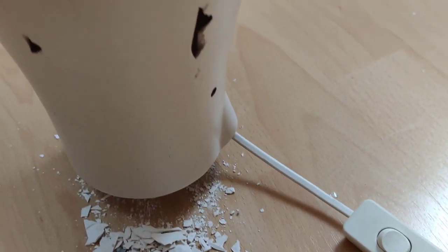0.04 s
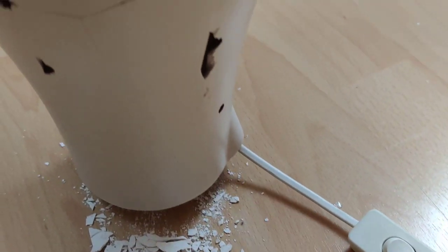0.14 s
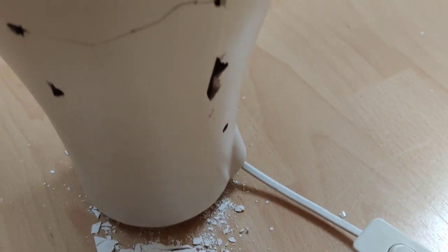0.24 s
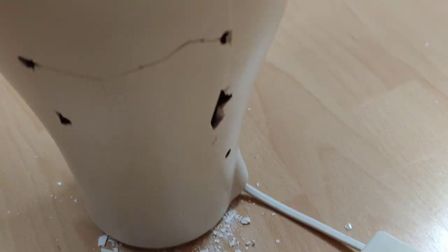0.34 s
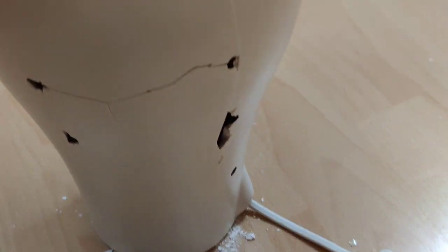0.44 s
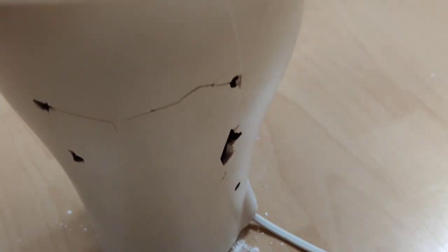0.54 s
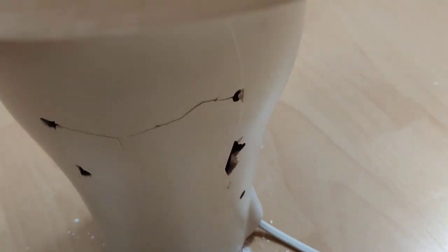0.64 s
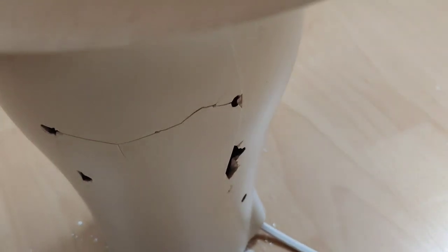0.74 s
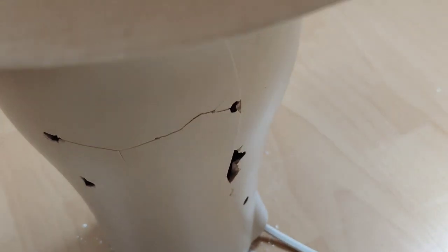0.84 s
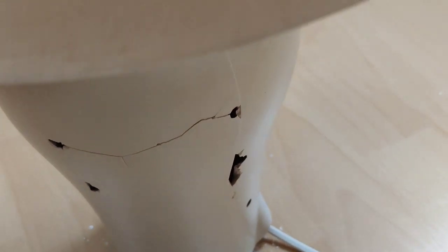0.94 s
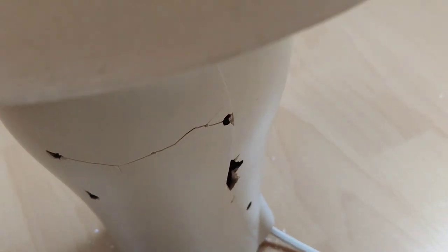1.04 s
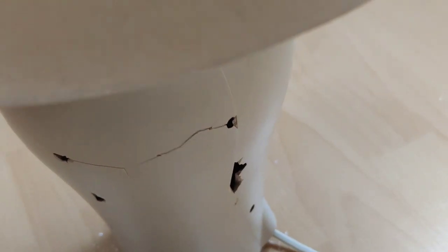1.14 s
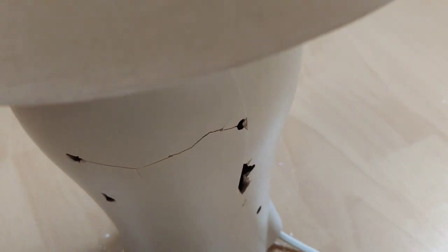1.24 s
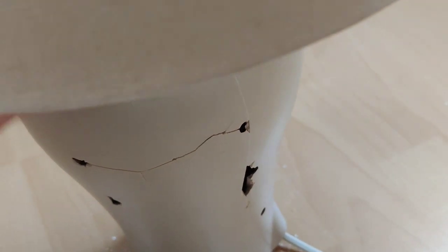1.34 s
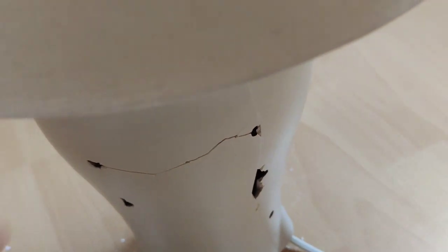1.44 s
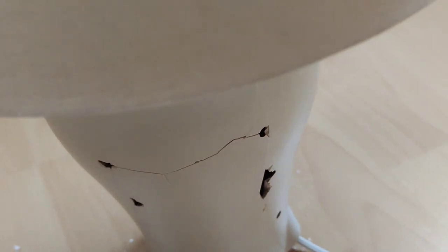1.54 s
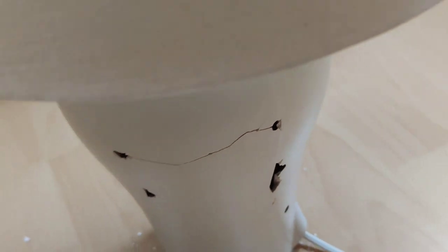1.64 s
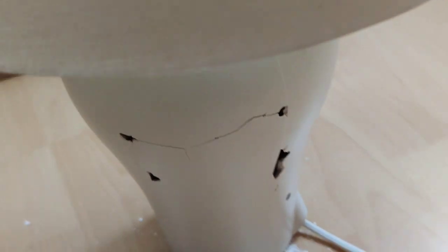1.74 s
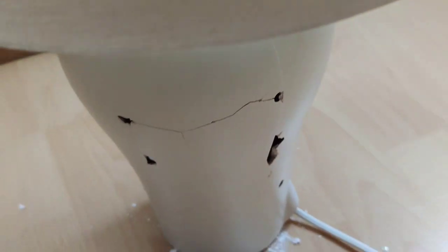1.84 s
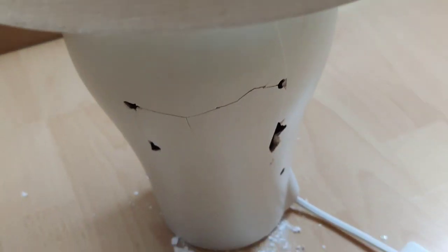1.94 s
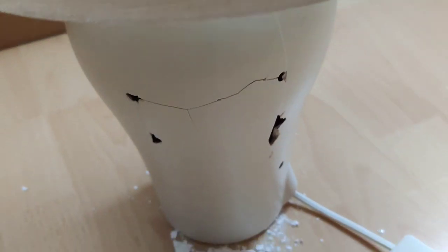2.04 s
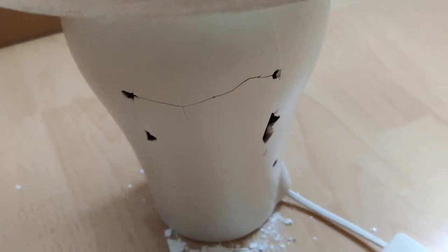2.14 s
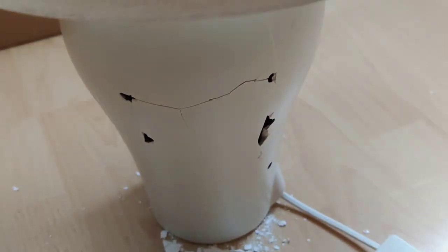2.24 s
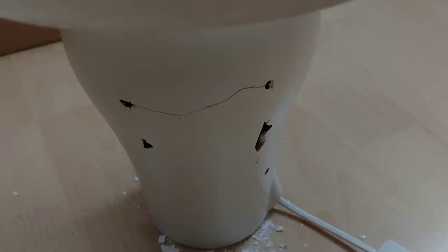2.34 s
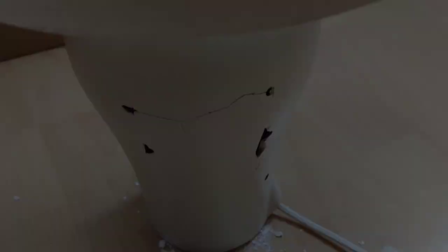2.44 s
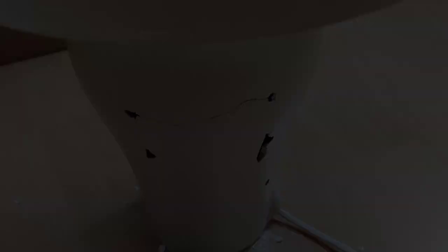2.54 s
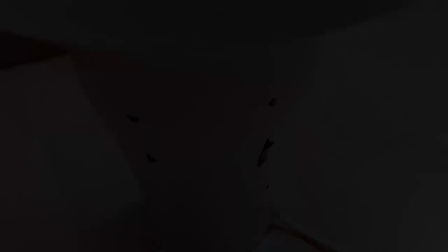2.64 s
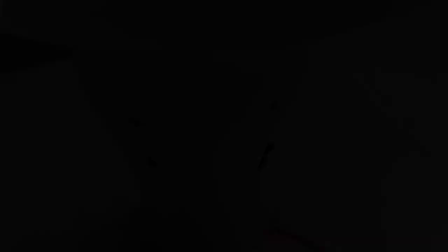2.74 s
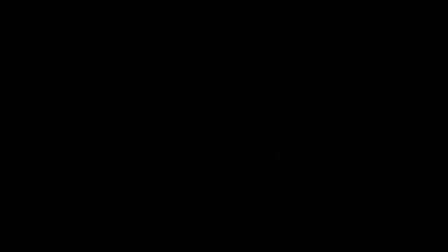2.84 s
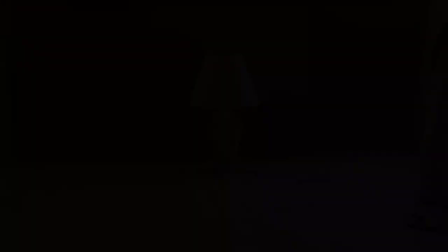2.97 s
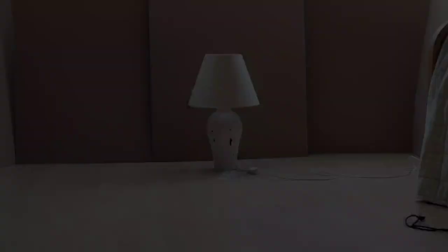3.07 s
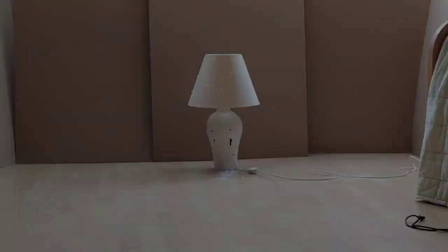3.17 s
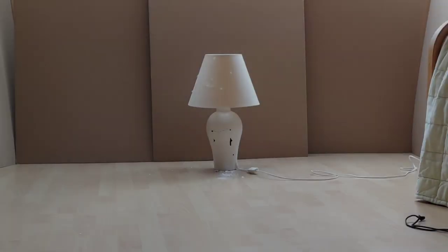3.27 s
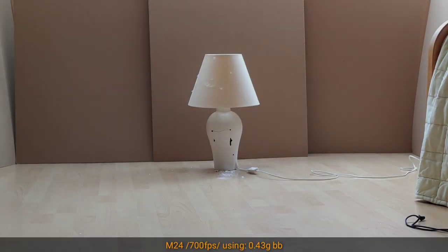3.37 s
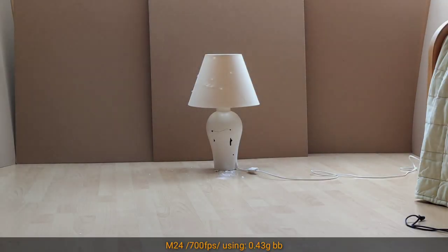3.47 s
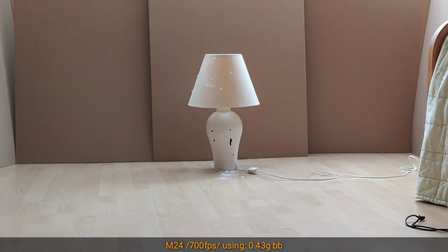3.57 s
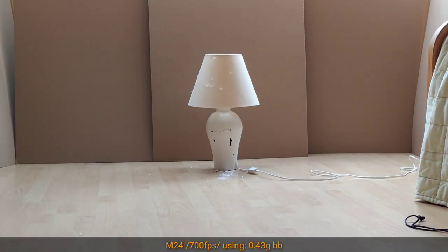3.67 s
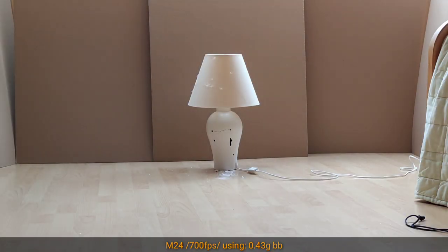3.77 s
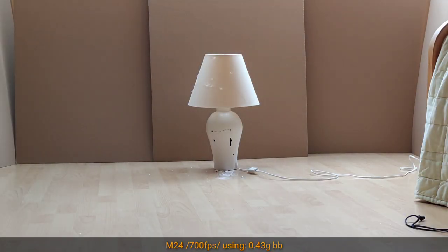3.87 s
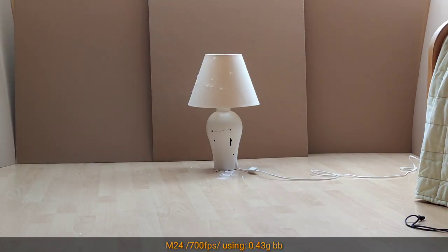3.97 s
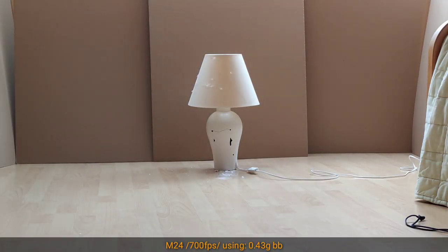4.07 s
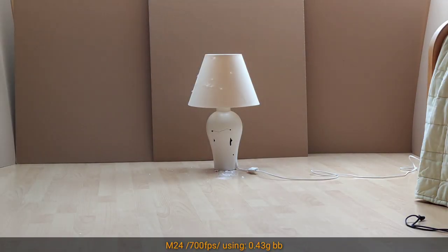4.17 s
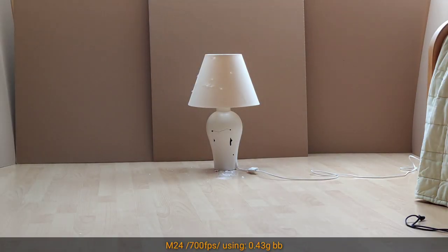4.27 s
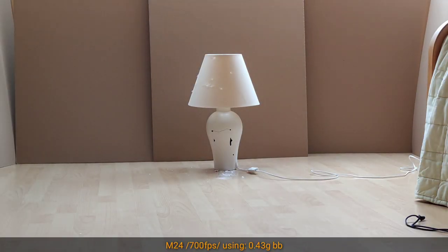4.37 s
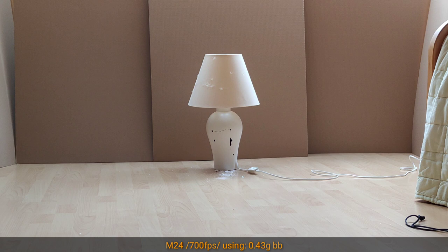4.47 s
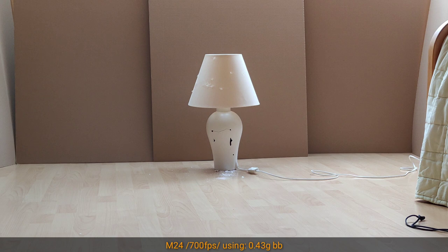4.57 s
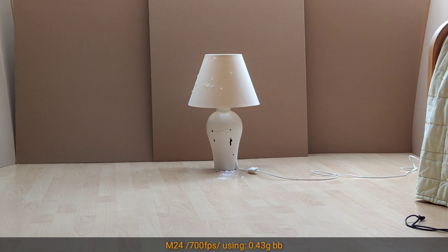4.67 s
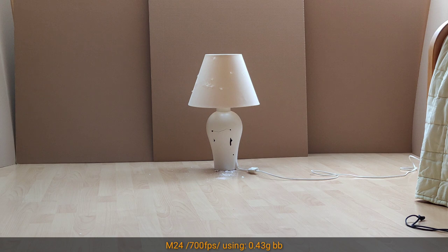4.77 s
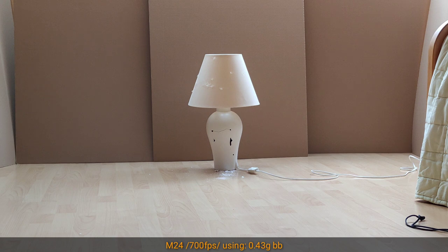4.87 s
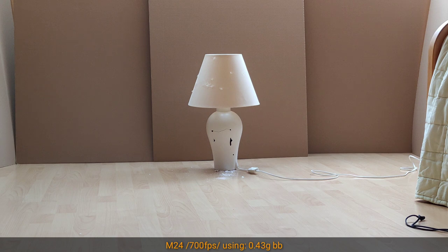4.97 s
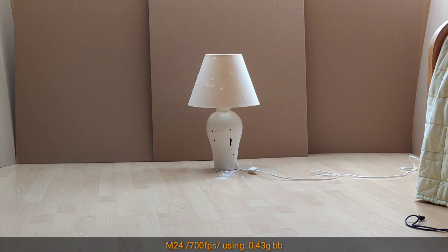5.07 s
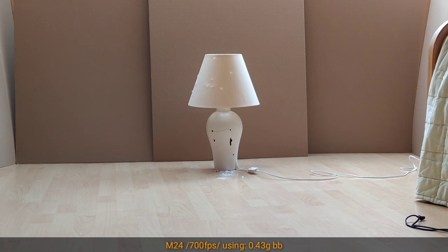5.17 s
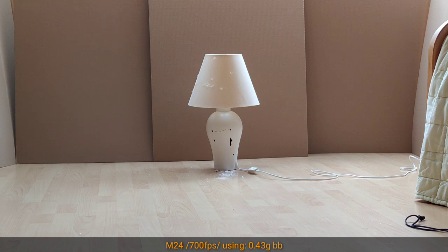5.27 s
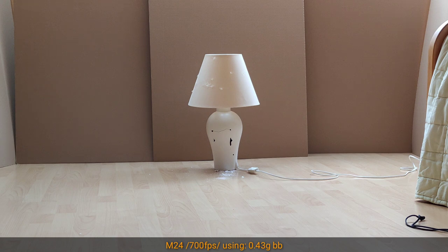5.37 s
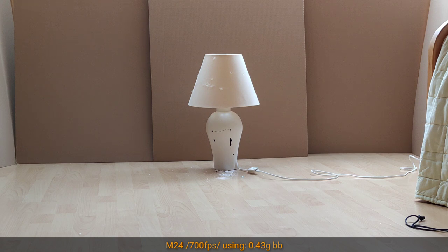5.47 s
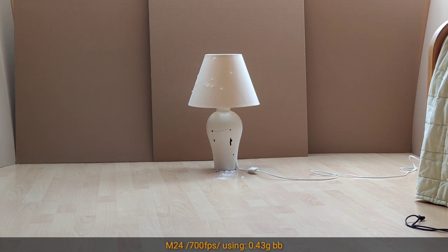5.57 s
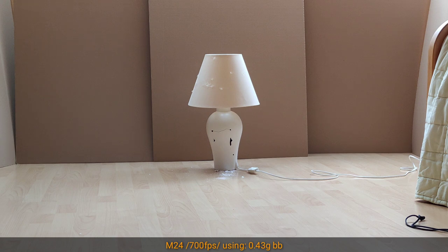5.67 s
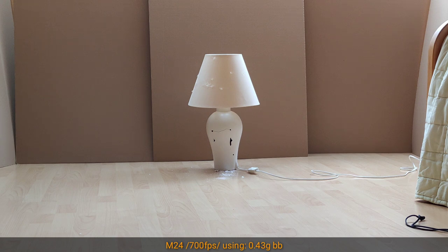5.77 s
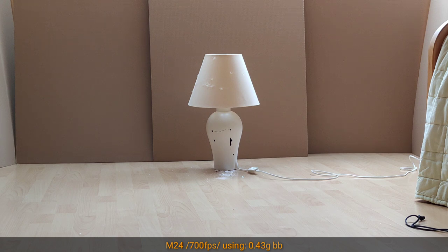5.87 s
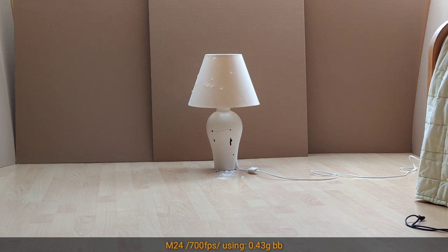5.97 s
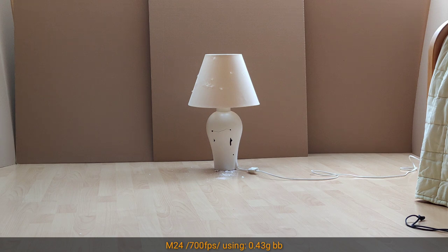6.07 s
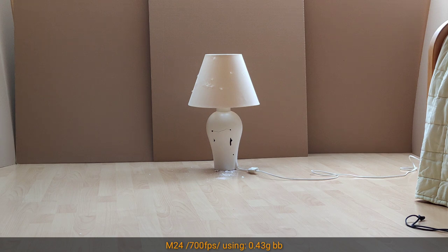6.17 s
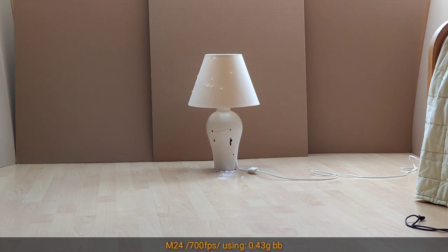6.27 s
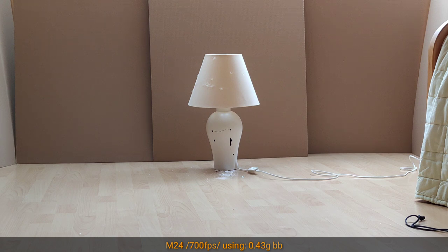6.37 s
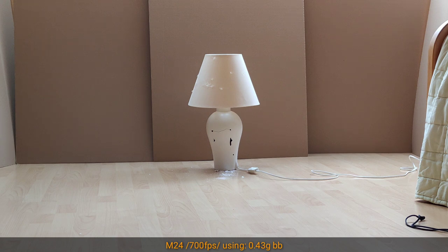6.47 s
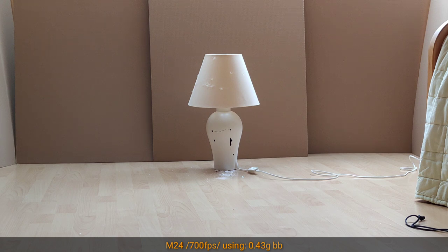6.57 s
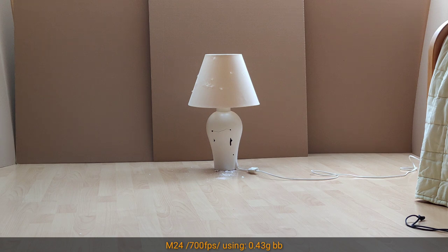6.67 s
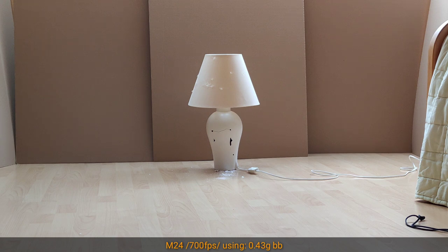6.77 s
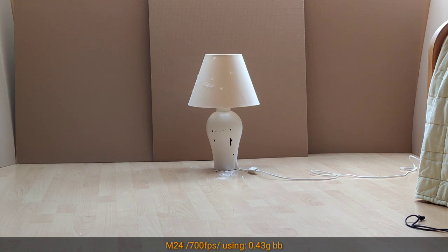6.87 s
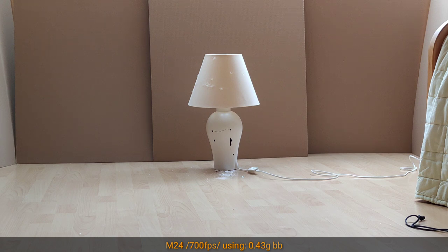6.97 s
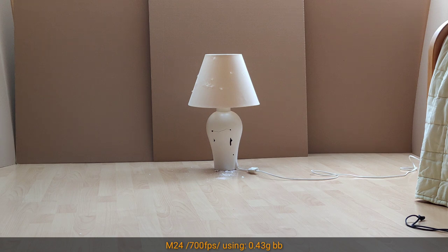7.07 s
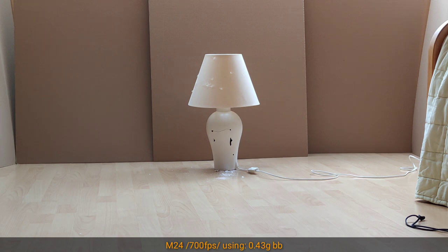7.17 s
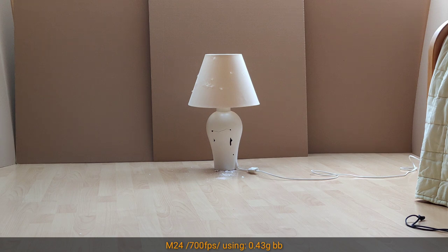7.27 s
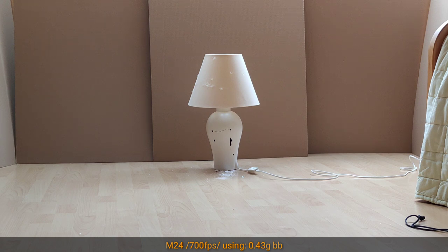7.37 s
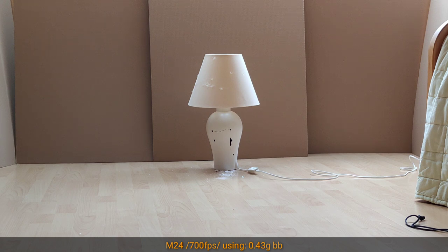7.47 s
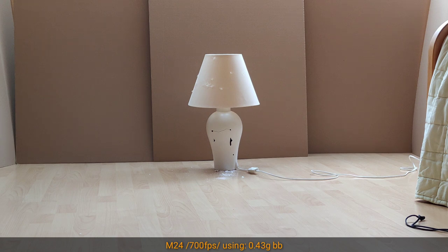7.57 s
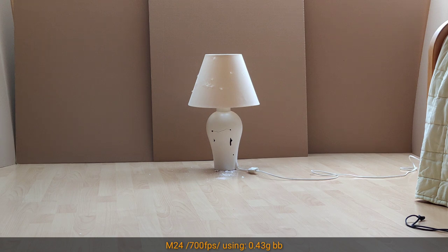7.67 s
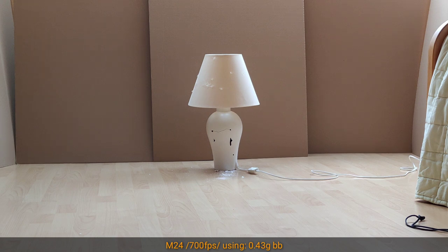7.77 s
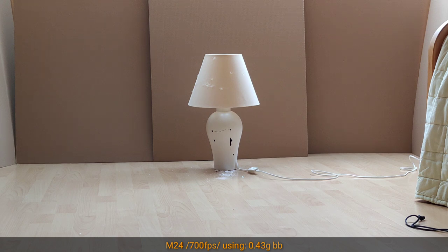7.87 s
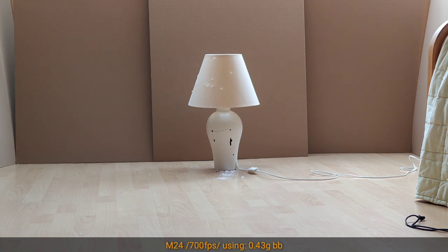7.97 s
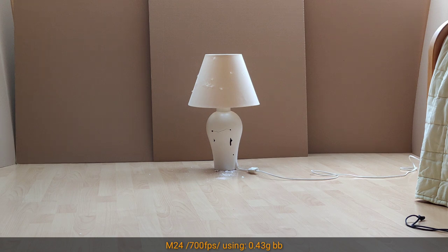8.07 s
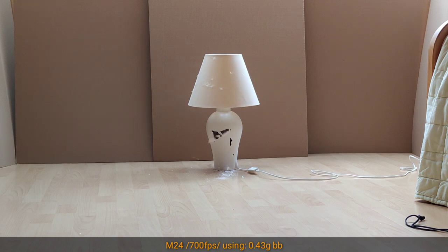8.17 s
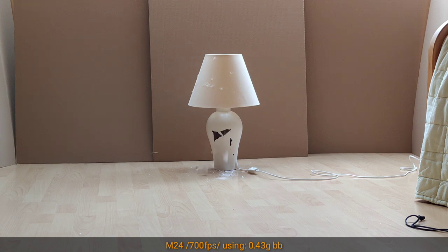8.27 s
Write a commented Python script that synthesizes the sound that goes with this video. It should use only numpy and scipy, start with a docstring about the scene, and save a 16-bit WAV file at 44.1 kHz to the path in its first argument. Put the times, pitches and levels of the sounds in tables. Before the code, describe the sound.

A ceramic lamp is handled close to the microphone, with short knocks, clicks and light rubs over a faint low hum. The background fades away and the quiet tone of a bare room fades in. Slightly to the right, a spring rifle's bolt slides back, pushes home and locks with sharp clicks. After a pause, the rifle fires with a loud snapping pop and the pellet shatters the ceramic in a bright spray.

```python
"""Spring rifle shatters a lamp

A chipped ceramic lamp is handled up close, with knocks, clicks and rubs over a faint engine-like hum. The scene
fades out and changes to a bare room, which fades in. A spring rifle's bolt slides back, is pushed home and
locked. Then spring and piston slam, the muzzle pops and the pellet shatters the side of the lamp."""
import sys
import numpy as np
from scipy import signal
from scipy.fft import rfft, irfft, next_fast_len
from scipy.io import wavfile
from scipy.ndimage import map_coordinates

SR = 44100
rng = np.random.default_rng(int(sys.argv[2]) if len(sys.argv) > 2 else 0)


def master_out(mix):
    """Clip the mix to full scale and print it as 16-bit PCM to the path in sys.argv[1]."""
    frames = np.transpose(np.atleast_2d(mix))
    ceiling = np.clip(frames, -1, 1)
    pcm = np.round(ceiling * 32767).astype(np.int16)
    wavfile.write(sys.argv[1], SR, pcm)


N = 366894


def amp(db):
    """Decibels to gain."""
    return 10 ** (np.asarray(db) / 20)


def unit(x):
    """x at rms 1."""
    return x / np.sqrt(np.mean(x ** 2) + 1e-20)


def along(points, hz):
    """Read a curve of (Hz, value) points on a log frequency axis."""
    freqs, values = np.transpose(points)
    return np.interp(np.log(hz + 1), np.log(freqs + 1), values)


def wobble(rate):
    """A smooth random curve, rate knots a second."""
    return map_coordinates(rng.standard_normal(int(N * rate / SR) + 4), [np.arange(N) * rate / SR])


def decay(t, t60):
    """An envelope that falls 60 dB in t60 seconds."""
    return np.exp(-np.log(1000) * t / np.maximum(t60, 1e-4))


def filtered(x, response):
    """x times a frequency response."""
    n = x.shape[-1]
    size = next_fast_len(n + SR // 4)
    return irfft(rfft(x, size) * response(np.fft.rfftfreq(size, 1 / SR)), size)[..., :n]


def eq(x, gain_db, size=2048):
    """x through a minimum-phase filter with the given dB at each frequency."""
    cepstrum = irfft(np.log(amp(gain_db(np.fft.rfftfreq(size, 1 / SR)))))
    cepstrum[1:size // 2] *= 2
    cepstrum[size // 2 + 1:] = 0
    impulse = irfft(np.exp(rfft(cepstrum)))
    return signal.fftconvolve(np.atleast_2d(x), impulse[None], axes=1)[:, :x.shape[-1]]


def add(track, start_s, sound):
    """Lay a sound into the track."""
    part = track[:, round(start_s * SR):][:, :sound.shape[-1]]
    part += sound[..., :part.shape[-1]]


# tone of each microphone port: (frequency [Hz], gain [dB])
LEFT_EQ = [(1000, 0.5), (3500, 0.5), (5800, -2), (7200, -1), (8300, 9.5), (9700, 4), (11500, 2.5)]
RIGHT_EQ = [(1000, 1.5), (5600, 2.5), (7500, 0), (12000, 0.5), (15000, 6)]

def ports(x, notch_db, notch_hz=8200, width_hz=900):
    """The left port resonates; the right has a notch whose depth goes with the source's direction."""
    notch = lambda hz: notch_db / (1 + ((hz - notch_hz) / width_hz) ** 2)
    left = eq(x[0], lambda hz: along(LEFT_EQ, hz))
    right = eq(x[1], lambda hz: along(RIGHT_EQ, hz) - notch(hz))
    return np.vstack([left, right])


# reverb time of the bare room: (frequency [Hz], t60 [s])
ROOM_DECAY = [(100, 0.84), (500, 0.31), (1500, 0.38), (9000, 0.38), (15000, 0.22)]

def room(x, wet_db, early_db, early_t60):
    """x with early reflections from things nearby and the tail of the bare room."""
    hz, frame_s, bands = signal.stft(rng.standard_normal((2, x.shape[-1])), SR, nperseg=256)
    tail = signal.istft(bands * decay(frame_s, along(ROOM_DECAY, hz)[:, None]), SR, nperseg=256)[1]
    t = np.arange(tail.shape[-1]) / SR
    tail = tail * (1 - np.exp(-t / 0.0021))
    early = rng.standard_normal(tail.shape) * decay(t, early_t60) * (t > .001)
    # long waves pass round nearby things and are hardly scattered
    early = filtered(early / np.linalg.norm(early[0]), lambda hz: hz ** 2 / (hz ** 2 + 900 ** 2))
    tail = filtered(tail / np.linalg.norm(tail[0]), lambda hz: hz / (hz + 150))
    reverb = amp(wet_db) * tail + amp(early_db) * early
    return x + signal.fftconvolve(x, reverb, axes=1)[:, :x.shape[-1]]


# room tone by the lamp and in the wide room: (frequency [Hz], level [dB])
CLOSE_TONE = [(12, -52.5), (20, -14), (107, -7.5), (248, -15.5), (1090, -25.5), (2140, -32), (7110, -45.5),
              (14700, -42.5)]
WIDE_TONE = [(15, -12), (40, -2), (115, -5), (142, 2), (175, -8), (300, -12.5), (2000, -24), (6500, -34.5),
             (16000, -33.5)]
# how alike left and right are: (frequency [Hz], correlation [0-1])
TONE_CORRELATION = [(40, 0.7), (600, 0.46), (2000, 0)]

def room_tone(spectrum, level_db):
    """A steady bed: rumble much alike in both ears, under fully wide hiss."""
    def mid_side_gains(hz):
        angle = np.arccos(np.clip(along(TONE_CORRELATION, hz), -1, 1)) / 2
        return amp(along(spectrum, hz)) * [np.cos(angle), np.sin(angle)]
    mid, side = filtered(rng.standard_normal((2, N)), mid_side_gains)
    return amp(level_db) * unit(np.array([mid + side, mid - side]))


# low resonances of the room: (frequency [Hz], width [Hz], level [dB])
ROOM_MODES = [(73.2, 4, -61.5), (101.6, 5.1, -57), (149.3, 5.8, -58.5), (218, 16, -67)]

def hum(idle_hz=36.35, sag_hz=3.5, sag_start_s=1.45, sag_time_s=0.51):
    """A hum like an engine idling outside; as it slows, its harmonics slide through the room's modes."""
    slowing_s = np.maximum(np.arange(N) / SR - sag_start_s, 0)
    pitch = idle_hz - sag_hz * (1 - np.exp(-slowing_s / sag_time_s))
    phase = 2 * np.pi * np.cumsum(pitch * (1 + 0.0045 * wobble(9.4))) / SR
    track = np.zeros(N)
    for k in range(2, 7):
        power = sum(amp(db) ** 2 / (1 + (2 * (k * pitch - hz) / width) ** 2)
                    for hz, width, db in ROOM_MODES)
        waver = amp(1.6 * wobble(12))
        track += np.sqrt(2 * power) * waver * np.sin(k * phase + 2 * np.pi * rng.random())
    return track


def ring(modes, t, scatter_db, detune=.03):
    """A struck body, peak 1: each blow lands on another spot, varying the modes' level and pitch."""
    wave = np.zeros(len(t))
    for k, (hz, width, db) in enumerate(modes):
        envelope = amp(db + scatter_db * rng.normal()) * width * np.exp(-np.pi * width * t)
        pitch = hz * (1 + detune * rng.normal())
        wave += (-1) ** k * envelope * np.sin(2 * np.pi * pitch * t)
    # little radiates below the lowest mode
    wave = signal.lfilter(*signal.butter(2, modes[0][0] * 2 / 3, "highpass", fs=SR), wave)
    return wave / np.abs(wave).max()


def hardness(hz, treble_db):
    """A high shelf in dB: harder contacts are brighter."""
    return along([(3200, 0), (9000, treble_db)], hz)


def contacts(cues, body, spectrum, crack_db, crack_t60, rise_s, bright_db, early_db):
    """Each contact is a short crack and a knock of the body, answered by the room."""
    track, t = np.zeros((2, N)), np.arange(SR // 2) / SR
    for start, db, knock_db, treble_db, *_ in cues:
        burst = rng.standard_normal((2, len(t))) * decay(t, crack_t60) * (1 - np.exp(-t / rise_s))
        crack = eq(burst, lambda hz: along(spectrum, hz) + hardness(hz, treble_db + bright_db))
        hit = amp(crack_db) * crack + amp(knock_db + 9.5) * ring(body, t, scatter_db=3.5)
        send_db = -.45 * max(-16.5 - knock_db, 0)  # a click with little knock hardly stirs the room
        hit = room(hit, wet_db=send_db - 3, early_db=send_db + early_db, early_t60=0.049)
        add(track, start, amp(db) * hit)
    return track


def stroke(start, length, db, swell_db):
    """Envelope of one stroke: it gathers speed, swells or eases, and dies away with the room."""
    t = np.maximum(np.arange(N) / SR - start, 0)
    attack = np.minimum(t / (0.17 * length), 1)
    release = decay(np.maximum(t - length, 0), t60=0.36)
    return attack * amp(db + swell_db * np.minimum(t / length, 1)) * release


# resonances that scraping excites: (frequency [Hz], width [Hz], level [dB])
SCRAPE_MODES = [(644, 64, 2.5), (850, 160, -1), (1830, 850, -6), (2730, 150, -7), (5000, 200, -17.5)]

def friction(cues, rough_db, grain_rate, snag_rate, scrape_db, ring_db, ring_width_hz, rise_hz_per_s):
    """Surfaces catch and slip in grains and snag on burrs, exciting set modes and one that can glide."""
    grains = unit(rng.standard_normal((2, N)) * amp(rough_db * wobble(grain_rate) + 2.3 * wobble(25)))
    snags = (rng.random(N) < snag_rate / SR) * rng.standard_normal((2, N))
    slips = grains + amp(-10) * unit(snags)
    scrape = sum(amp(db) * signal.lfilter(*signal.iirpeak(hz, hz / width, fs=SR), slips)
                 for hz, width, db in SCRAPE_MODES)
    band = signal.butter(2, [SCRAPE_MODES[0][0] / 2, 9500], "bandpass", fs=SR)
    scrape = amp(scrape_db) * unit(signal.lfilter(*band, scrape))
    flutter = amp(ring_db) * unit(signal.lfilter(*signal.butter(2, ring_width_hz / 2, fs=SR), slips))
    track = np.zeros((2, N))
    for start, length, db, swell_db, ring_hz, treble_db in cues:
        pitch = ring_hz + rise_hz_per_s * np.clip(np.arange(N) / SR - start, 0, length)
        ringing = np.sqrt(2) * flutter * np.sin(2 * np.pi * np.cumsum(pitch) / SR)
        rasp = eq(scrape, lambda hz: hardness(hz, treble_db))
        track += stroke(start, length, db, swell_db) * (rasp + ringing)
    return track


def from_right(x, shade_db, lag_s):
    """A source on the right reaches the left port later and weaker."""
    late_left = filtered(x[0], lambda hz: np.exp(-2j * np.pi * hz * lag_s))
    return np.array([amp(shade_db) * late_left, x[1]])


# knocks beside the lamp: (time [s], level [dB], knock trim [dB], treble trim [dB])
KNOCK_CUES = [(.4565, -28.5, -13, 4), (.4614, -15.5, -10, -7), (.4665, -14.5, -17.5, -17.5),
              (.474, -24, -14, -8.5), (.7141, -39.5, -3, -13.5), (1.0438, -44, -7.5, 1.5),
              (1.0826, -29.5, -14.5, -17), (1.0935, -29.5, -12, -9), (1.1005, -34, -5.5, -18.5),
              (1.1329, -21, -15.5, -5), (1.143, -26.5, -20.5, -7.5), (1.1515, -21.5, -18, -9.5),
              (1.1864, -29.5, -21, -4), (1.2377, -22, -14.5, -9), (1.244, -37, -12, -7.5),
              (1.3548, -40.5, -11, -3), (1.363, -34.5, -10, -26), (1.8048, -40.5, -33, -22),
              (1.9043, -41.5, -17, -8)]
# their body: (frequency [Hz], width [Hz], level [dB])
KNOCK_MODES = [(78, 14, 8.5), (248, 28, 0.5), (584, 92, 2), (826, 100, 4.5), (1510, 65, -1.5),
               (2920, 25, -8.5), (3980, 250, -16)]
# their sharp attack: (frequency [Hz], gain [dB])
KNOCK_EQ = [(300, -21.5), (900, 2), (1500, 3), (2100, -0.5), (4300, 1.5), (10000, -7), (15000, -15.5)]
# rubs of hand and cord: (time [s], length [s], level [dB], swell [dB], resonance [Hz], treble [dB])
RUB_CUES = [(-.03, 0.13, -53, -7, 978, -6.5), (.665, 0.062, -58.5, 2.5, 807, -1),
            (1.085, 0.046, -41.5, -7, 1607, 2.5), (1.2, 0.22, -53.5, -9.5, 902, 4)]

def handling():
    """Close-up knocks, and the light rubbing of hand and cord."""
    knocks = contacts(KNOCK_CUES, KNOCK_MODES, KNOCK_EQ, crack_db=5.5, crack_t60=0.011,
                      rise_s=0.00074, bright_db=10.5, early_db=-3.5)
    rubbing = friction(RUB_CUES, rough_db=2.5, grain_rate=110, snag_rate=140, scrape_db=-1.5,
                       ring_db=0, ring_width_hz=300, rise_hz_per_s=0)
    return ports(knocks + rubbing, notch_db=15.5)


# bolt and trigger clicks: (time [s], level [dB], knock trim [dB], treble trim [dB], ping trim [dB])
CLICK_CUES = [(3.332, -28.5, -33, -12.5, -13.5), (3.7612, -30, -24, -21.5, -37),
              (3.849, -42.5, -12, -20, -20), (3.903, -38.5, -13, -17, -16),
              (3.9226, -28, -22.5, -19.5, -24), (3.9518, -36, -20, -19, -22), (3.973, -39, -13, -20, -24),
              (4.0094, -25.5, -26, -19.5, -21), (4.0432, -24.5, -17.5, -4.5, -9.5),
              (4.2872, -39, -2.5, -9.5, -6), (5.0593, -25.5, -14, -17.5, -11),
              (5.0819, -28, -16.5, -3.5, -17), (5.222, -27.5, -13, -14.5, -5),
              (5.366, -25, -14, -19.5, -15), (5.504, -47.5, -3.5, -20, -15), (5.5796, -34, -20, 0, -37),
              (5.593, -22, -19.5, -7, -27), (5.5964, -23.5, -6, -17, -16.5), (8.2133, -50, -19, -26, -14)]
# the rifle's body: (frequency [Hz], width [Hz], level [dB])
RIFLE_MODES = [(192, 145, -11), (367, 115, -4), (519, 123, 0.5), (654, 80, 1.5), (907, 106, 0),
               (1570, 1230, -12)]
# the clicks' sharp attack: (frequency [Hz], gain [dB])
CLICK_EQ = [(200, -23), (600, -3), (1800, 5.5), (3500, 5), (6000, 2), (9500, -3.5), (12500, -14),
            (15000, -10)]
# bolt strokes: (time [s], length [s], level [dB], swell [dB], resonance [Hz], treble [dB])
SLIDE_CUES = [(3.27, 0.094, -64.5, 8.5, 620, 4), (3.42, 0.46, -53.5, -3, 725, -1.5),
              (3.89, 0.17, -54, 3, 786, -3), (4.275, 0.13, -50, -9.5, 803, 3.5),
              (4.803, 0.083, -52.5, -7, 604, 5.5), (4.94, 0.15, -57.5, -3, 600, 8),
              (5.366, 0.057, -48.5, -6, 1450, -12)]

def bolt():
    """The bolt slides back against the spring, catches, slides home and locks; its cylinder pings."""
    clicks = contacts(CLICK_CUES, RIFLE_MODES, CLICK_EQ, crack_db=3.5, crack_t60=0.0098,
                      rise_s=0.001, bright_db=14.5, early_db=-6.5)
    t = np.arange(SR // 3) / SR
    ping = np.array([np.sin(2 * np.pi * 2900 * t) * decay(t, 0.02)] * 2)
    for start, db, *_, ping_db in CLICK_CUES:
        wet_ping = room(ping, wet_db=-12.5, early_db=-26, early_t60=.04)
        add(clicks, start, amp(db + ping_db + 6.5) * wet_ping)
    sliding = friction(SLIDE_CUES, rough_db=2, grain_rate=320, snag_rate=60, scrape_db=-0.5,
                       ring_db=-4, ring_width_hz=107, rise_hz_per_s=250)
    return ports(from_right(clicks + sliding, shade_db=-1.5, lag_s=0.000398), notch_db=10.5)


# partials of the ceramic shell: (frequency [Hz])
LAMP_PARTIALS = [2920, 3070, 5660, 7030, 8245, 9040, 9460]

def shatter(t, ticks_per_s=5000):
    """The shell rings while the spreading fracture and colliding splinters spray bright ticks."""
    shell = sum(np.sin(2 * np.pi * (hz * t + rng.random((2, 1)))) for hz in LAMP_PARTIALS)
    shell = amp(-22) * unit(shell) * (1 - np.exp(-t / 0.00081)) * decay(t, 0.35)
    ticks = (rng.random((2, len(t))) < ticks_per_s / SR) * rng.standard_normal((2, len(t)))
    spray = eq(ticks, lambda hz: along([(500, -2.5), (2500, 2.5), (6000, 4.5), (15000, -3)], hz))
    return shell + amp(-12.5) * unit(spray) * (1 - np.exp(-t / 0.01)) * decay(t, 1.5)


# sear, spring, piston, muzzle, pellet on the lamp: (time [s], blast [dB], blast t60 [s], thump [dB])
SHOT_CUES = [(8.243, -27, 0.064, -50), (8.2455, -14.5, 0.047, -20.5), (8.2536, -11.5, 0.19, -14.5),
             (8.264, -13, 0.13, -20.5), (8.272, -21, 0.38, -52)]
# tone of the noise blasts: (frequency [Hz], gain [dB])
BLAST_EQ = [(100, -1.5), (450, 3), (1200, -0.5), (2700, 2), (5000, -1), (8500, 0), (12000, -6),
            (15500, -8.5)]
# the weight under them: (frequency [Hz], width [Hz], level [dB])
THUMP_MODES = [(39.6, 64, 15), (114, 60, 7.5), (534, 60, 6.5), (910, 54, -8)]

def shot():
    """Spring and piston slam, the muzzle pops, and the pellet breaks the lamp."""
    track, t = np.zeros((2, N)), np.arange(SR // 4) / SR
    for start, blast_db, t60, thump_db in SHOT_CUES:
        blast = unit(eq(rng.standard_normal((2, len(t))), lambda hz: along(BLAST_EQ, hz)))
        add(track, start, amp(blast_db) * blast * decay(t, t60))
        thump = -np.array([ring(THUMP_MODES, t, scatter_db=1)] * 2)
        add(track, start, amp(thump_db) * room(thump, wet_db=-2, early_db=2, early_t60=0.051))
    impact_s = SHOT_CUES[-1][0]
    add(track, impact_s, shatter(t))
    return ports(track, notch_db=1.5)


def fader(position):
    """Gain of a fader that travels from 0 (silent) to 1 (open)."""
    return np.clip(position, 0, 1) ** 1.28


def scene():
    """Handling, bolt and shot over two beds: the close one fades out, the wide one fades in."""
    t = np.arange(N) / SR
    close_bed = hum() + ports(room_tone(CLOSE_TONE, level_db=-59.5), notch_db=2.5)
    wide_bed = ports(room_tone(WIDE_TONE, level_db=-64.5), notch_db=4.5)
    ambience = fader((3.006 - t) / 0.75) * close_bed + fader((t - 2.99) / 0.64) * wide_bed
    return ambience + handling() + bolt() + shot()


def record(dry):
    """A soft clip rounds the highest peaks, then a steep low-pass trims the top."""
    ceiling, cutoff_hz = .9, 15900
    rounded = dry / (1 + np.abs(dry / ceiling) ** 4) ** (1 / 4)
    return filtered(rounded, lambda hz: 1 / (1 + (hz / cutoff_hz) ** 160))


dry = scene()
out = record(dry)
master_out(out)
```